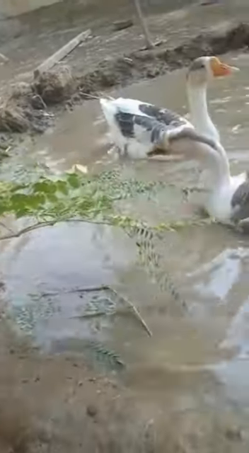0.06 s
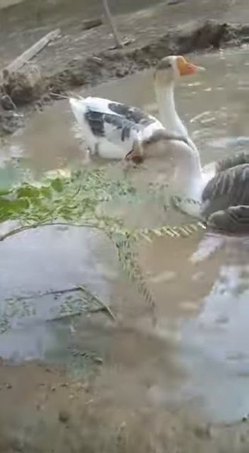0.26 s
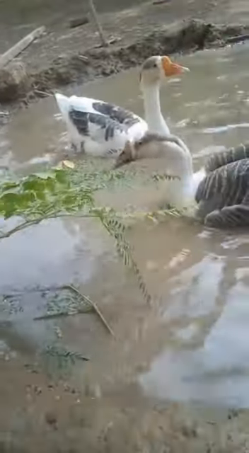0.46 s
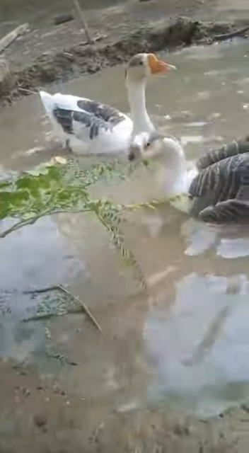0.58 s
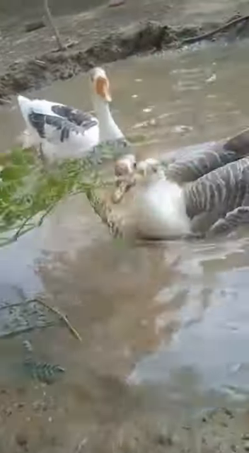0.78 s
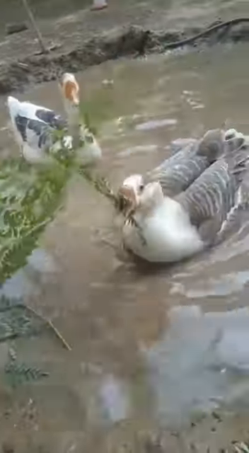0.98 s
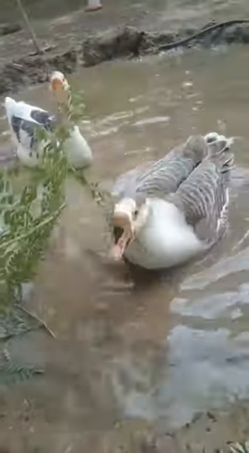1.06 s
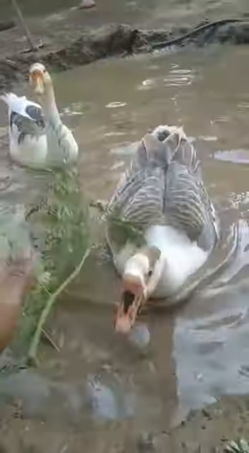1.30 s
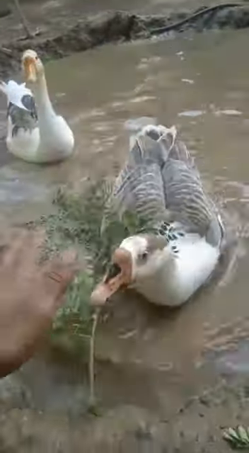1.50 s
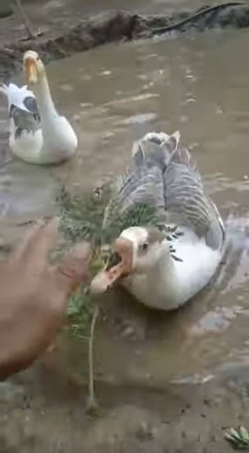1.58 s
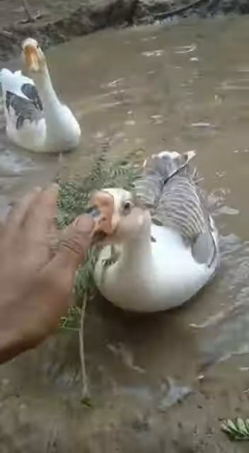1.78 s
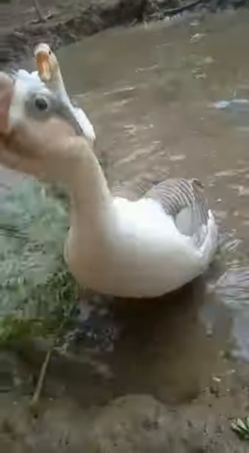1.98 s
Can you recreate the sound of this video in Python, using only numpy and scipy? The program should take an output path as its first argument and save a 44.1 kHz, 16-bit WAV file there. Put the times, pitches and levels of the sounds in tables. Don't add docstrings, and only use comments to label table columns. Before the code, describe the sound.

One loud, nasal goose honk comes early, a few metres away, with a short echo from the pond banks. Afterwards faint far geese, slight leaf rustles and a twig snap sit over a low engine drone.

```python
import sys
import numpy as np
from scipy import signal
from scipy.io import wavfile
from scipy.ndimage import uniform_filter1d

SR = 44100
rng = np.random.default_rng(int(sys.argv[2]) if len(sys.argv) > 2 else 0)


def to_wav(s):
    ch = np.atleast_2d(s).T
    pcm = np.round(np.clip(ch, -1, 1) * 32767)
    wavfile.write(sys.argv[1], SR, pcm.astype(np.int16))


def makeup_ratio(level_db):
    decades = np.asarray(level_db, float) / 20
    return 10 ** decades


N = 90404

# centre in Hz, width in Hz, level in dB, change at full gape in dB.
THROAT_MODES = [(650, 290, -6.5, -2), (855, 480, -1, -1), (1795, 170, 0.5, -3.5), (2078, 380, 3, 2),
                (2548, 150, -9.5, 10.5), (2850, 710, -23.5, 0.5), (3970, 840, -23.5, 9.5),
                (4950, 500, -20, -18), (5643, 730, -16.5, 0.5), (6760, 340, -35.5, 11.5),
                (9650, 1400, -45, -11.5), (11850, 1400, -51.5, 8)]


def curve(table, col):
    rows = np.array(table, float)
    return np.interp(np.arange(N) / SR, rows[:, 0], rows[:, col])


def level(x, db):
    return x * makeup_ratio(db) / np.sqrt(np.mean(x ** 2))


def band(x, hz, width_hz):
    return signal.lfilter(*signal.iirpeak(min(hz, 0.45 * SR), hz / width_hz, fs=SR), x)


def band_twice(x, hz, width_hz):
    return band(band(x, hz, width_hz), hz, width_hz)


def walk(rate_hz):
    hold = int(SR / rate_hz)
    steps = np.repeat(rng.standard_normal(N // hold + 1), hold)
    return 1.335 * uniform_filter1d(uniform_filter1d(steps, hold), hold)[:N]


def turns(hz):
    return 2 * np.pi * np.cumsum(hz) / SR


def throat_gain(hz, gape):
    power = 0
    for centre_hz, width_hz, db, gape_db in THROAT_MODES:
        detune = 2 * (hz - centre_hz) / width_hz
        power = power + makeup_ratio(2 * (db + gape * gape_db)) / (1 + detune ** 2) ** 2
    return np.sqrt(power)


def throat_breath(gape):
    tilt_db_per_octave = 12.5
    out = 0
    for hz, width_hz, db, gape_db in THROAT_MODES:
        hiss = level(band_twice(rng.standard_normal(len(gape)), hz, 1.9 * width_hz), 0)
        out = out + makeup_ratio(db + gape * gape_db) * hiss * makeup_ratio(tilt_db_per_octave * np.log2(hz / 2000))
    return level(out, 0)


def syrinx_lines(second_db, half_db, rasp_db, gape):
    difference_db, mixing, lower_half_db = -6, 0.3, -13
    lines = [(0.00057, 0.99, second_db + 1.5)]
    lines += [(m, 0, 0) for m in range(1, 16)]
    for m in range(1, 10):
        for n in (-4, -3, -2, -1, 1, 2, 3):
            order_db = second_db * (1 + mixing * (abs(n) - 1))
            lines.append((m, n, order_db + difference_db * gape * (n < 0)))
    for m in range(8):
        for n in (-1, 1):
            lines.append((m + 1 / 2, n, half_db + lower_half_db * ((m, n) != (1, 1))))
    lines += [(m + 1 / 2, -1 / 2, rasp_db) for m in range(1, 7)]
    return lines


def goose():
    # time in seconds, pitch in Hz, level in dB.
    creak = [(0.218, 878, -83), (.237, 891, -61.5), (.26, 873.8, -53.5), (0.267, 851.8, -55.5)]
    voice = [(.276, 837.4, -60), (.282, 847.2, -46), (.306, 882, -45.5), (.345, 887, -48),
             (.388, 981.2, -39), (.478, 963.5, -39.5), (.503, 1030, -41), (.54, 1002, -43),
             (.598, 953, -44.5)]
    ending = [(.605, 928, -47.5), (.612, 848.5, -48), (.62, 776, -62), (.625, 760, -85)]
    # time in seconds, pitch in Hz, strength against the main voice in dB.
    second_voice = [(.23, 722, 0), (.29, 707.3, -8), (.315, 745.6, -4.5), (.33, 650, -27.5),
                    (.392, 639, -7.5), (.408, 566.2, -13.5), (.482, 564.5, -12.5), (.5, 691.4, -7),
                    (.555, 690.7, -6), (.58, 687, -35)]
    # time in seconds, brightness in dB per octave, breath level in dB.
    effort = [(.23, -14, -28), (.31, -16, -25), (.33, -12, -30), (.385, -4.5, -32.5), (.402, -3.5, -19),
              (.43, 1, -26), (.485, -1, -19.5), (.51, 0.5, -21), (.58, 5, -19.5)]
    # time in seconds, strength in dB.
    flutter = [(.385, -38.5), (.402, -12), (.414, -47), (.492, -40), (.507, 5), (.52, -36), (.533, -1),
               (.553, -17), (.575, -50)]
    # time in seconds, strength in dB.
    rasp = [(.385, -45), (.398, -11), (.42, -17), (.445, -19), (.475, -23.5), (.492, -14), (.5, -45)]
    # time in seconds, gape 0-1.
    bill = [(.23, 0), (.32, 0), (.385, 0.8), (.44, 0.96), (.47, 0.74), (.55, 0.7), (.572, 0.4), (.62, 0)]
    from_s, to_s, closes_s = 0.2, 0.63, 0.6
    jitter, flutter_sway_db, sway_db = 0.002, 2.0, 2.15
    closing_db_per_s, pinch_db_per_s, pinch_low_hz, pinch_high_hz = -2500, -2500, 1400, 2400
    creak_bass_db, creak_bass_hz = -12, 1410
    scatter_rad, blur_hz = 0.2, 9500

    cut = slice(int(from_s * SR), int(to_s * SR))
    t = np.arange(N)[cut] / SR
    call = [(from_s, creak[0][1], -110)] + list(creak) + list(voice)
    call += list(ending) + [(to_s, ending[-1][1], -110)]
    main_hz = (curve(call, 1) * (1 + jitter * walk(150)))[cut]
    second_hz = (curve(second_voice, 1) * (1 + 2 * jitter * walk(88.4)))[cut]
    main_phase, second_phase = turns(main_hz), turns(second_hz)
    second_db = curve(second_voice, 2)[cut]
    half_db = (curve(flutter, 1) + flutter_sway_db * walk(68.1))[cut]
    gape = np.clip(curve(bill, 1)[cut], 0, 1)
    sway = [walk(46.28)[cut] for _ in range(5)]
    grain = [walk(500)[cut] for _ in range(5)]
    closing_s = np.maximum(t - closes_s, 0)
    bright = curve(effort, 1)[cut] + closing_db_per_s * closing_s
    intake = t < voice[0][0]

    tone = 0
    for k, (m, n, db) in enumerate(syrinx_lines(second_db, half_db, curve(rasp, 1)[cut], gape)):
        hz = np.abs(m * main_hz + n * second_hz) + 1
        tilt_db = bright * np.maximum(np.log2(hz / 2400), 0)
        tilt_db = tilt_db + creak_bass_db * intake * (hz < creak_bass_hz)
        tilt_db = tilt_db + pinch_db_per_s * closing_s * (hz > pinch_low_hz) * (hz < pinch_high_hz)
        gain = makeup_ratio(db + tilt_db + sway_db * sway[k % 5]) * throat_gain(hz, gape) * (hz < 0.35 * SR)
        phase = m * main_phase + n * second_phase
        phase = phase + scatter_rad * abs(n) * sway[(k + 2) % 5]
        phase = phase + (hz / blur_hz) ** 3 * grain[k % 5]
        tone = tone + gain * np.sin(phase)

    puffs = 1 + makeup_ratio(second_db / 2) * np.cos(main_phase - second_phase)
    puffs = puffs + makeup_ratio(half_db / 2) * np.cos(second_phase - main_phase / 2)
    breath = puffs * throat_breath(gape) * makeup_ratio(curve(effort, 2)[cut])
    honk = np.zeros(N)
    honk[cut] = makeup_ratio(curve(call, 2)[cut]) * (tone + breath)
    return honk


def bank_echo(honk):
    echo_db, t60_s, delay_s = -17.5, 0.33, 0.019
    t = np.arange(SR // 2) / SR
    tail = rng.standard_normal(len(t)) * makeup_ratio(-60 * t / t60_s) * (t > delay_s)
    banks = level(tail, echo_db) / np.sqrt(len(t))
    return band(signal.fftconvolve(honk, banks)[:N], 1800, 1500)


def drips_and_twig():
    # start in seconds, peak in dB, ring in Hz, t60 in seconds.
    drips = [
        (.035, -48.5, 1700, 0.022),
        (0.05, -52.5, 1640, .03),
        (.055, -53, 1810, 0.023),
        (.387, -70, 8200, .01),
        (.434, -75, 8300, 0.012),
        (1.613, -63.5, 3280, 0.049),
        (2.0485, -57, 8500, 0.0044),
    ]
    # start in seconds, level in dB.
    snaps = [
        (2.0356, -54),
        (2.0369, -49),
    ]
    # ring in Hz, level in dB, t60 in seconds.
    twig = [(2190, -8, 0.03), (4200, 6.5, 0.0054), (5750, 2.5, 0.0049), (7600, 5.5, 0.0031),
            (9300, -2.5, 0.0043), (11800, -7, 0.0034)]
    rings = list(drips)
    rings += [(start, snap_db + db, hz, t60_s) for start, snap_db in snaps for hz, db, t60_s in twig]
    t, out = np.arange(N) / SR, 0
    for start, db, hz, t60_s in rings:
        age = np.maximum(t - start, 0)
        attack = 1 - np.exp(-age * hz)
        out = out + makeup_ratio(db - 60 * age / t60_s) * np.sin(2 * np.pi * hz * age) * attack
    return out


def leaves():
    # start in seconds, level in dB, decay in seconds, centre in Hz.
    rustles = [(0.372, -79, 0.015, 8760), (.66, -71, 0.024, 4500), (0.907, -83, 0.017, 8000),
               (1.137, -72.5, 0.034, 2970), (1.26, -77.5, 0.071, 5960), (1.37, -76, 0.031, 6900),
               (1.435, -74, 0.0017, 12000), (1.458, -68, 0.002, 8500), (1.482, -63.5, 0.0019, 6030),
               (1.508, -62, 0.0016, 9900), (1.555, -78, 0.022, 9000), (1.606, -69, 0.0016, 7000),
               (1.815, -80, .0015, 12000), (1.855, -75.5, 0.037, 4870), (1.967, -78, .015, 7900),
               (2.03, -74, 0.012, 6040), (2.034, -63, 0.0017, 14000)]
    rise_s = 0.0003
    t, out = np.arange(N) / SR, 0
    for start, db, decay_s, hz in rustles:
        age = np.maximum(t - start, 0)
        grit = rng.standard_normal(N) * makeup_ratio(2.4 * walk(900))
        shape = (1 - np.exp(-age / rise_s)) * np.exp(-age / decay_s)
        out = out + level(band(grit, hz, 0.41 * hz), db) * shape
    return out


def far_geese():
    # start in seconds, length in seconds, pitch in Hz, level in dB, second partial in dB.
    calls = [
        (0.743, 0.084, 890, -64.5, -11),
        (0.895, 0.1, 840, -66.5, -12),
        (1.073, 0.099, 865, -66.5, -9),
        (1.508, 0.11, 867, -73.5, -10),
        (1.897, 0.074, 817, -72, -8),
    ]
    t, out = np.arange(N) / SR, 0
    for start, length_s, hz, db, upper_db in calls:
        phase = turns(hz * (1 + 0.0135 * walk(60)))
        shape = np.sin(np.pi * np.clip((t - start) / length_s, 0, 1))
        partials = np.sin(phase) + makeup_ratio(upper_db) * np.sin(2 * phase)
        out = out + makeup_ratio(db + 4.7 * walk(50.54)) * shape * partials
    return out


def engine():
    # multiple of the engine rate, level in dB.
    orders = [(2, -70), (3, -58.5), (5, -69), (6.6, -73.5), (8, -66), (9, -64), (10, -63), (11, -75.5)]
    engine_hz, whine_hz, whine_width_hz, whine_db = 37.17, 3115, 280, -82.5
    phase = turns(engine_hz * (1 + 0.00482 * walk(3.12)))
    whine = level(band_twice(rng.standard_normal(N), whine_hz, whine_width_hz), whine_db)
    out = whine * makeup_ratio(2 * walk(5.52))
    for order, db in orders:
        fading = makeup_ratio(db + (2.0 + 0.22 * order) * walk(11.94))
        out = out + fading * np.sin(order * phase + 0.1 * order * walk(14))
    return out


def air(shape, db, flicker_db, swell_db):
    rows, out = np.array(shape), 0
    low_hz, high_hz = rows[0, 0], min(rows[-1, 0], 14000)
    for hz in low_hz * 2 ** np.arange(1 / 8, np.log2(high_hz / low_hz), 1 / 4):
        band_db = np.interp(np.log(hz), np.log(rows[:, 0]), rows[:, 1]) + 10 * np.log10(hz)
        noise = band_twice(rng.standard_normal(N), hz, hz / 4)
        out = out + level(noise, band_db) * makeup_ratio(swell_db + flicker_db * walk(14.06))
    return level(out, db)


def scene():
    # frequency in Hz, density in dB.
    air_low = [(25, -26.5), (45, -22), (75, -7.5), (100, -1), (150, -12), (250, -5.5), (400, -10.5),
               (520, -41)]
    air_mid = [(310, -32.5), (520, -10), (589, -2), (797, -1.5), (866, -6), (1050, -8.5), (1580, -4),
               (2700, -19), (3510, -56.5), (5940, -120)]
    air_high = [(2700, -10), (3600, -6), (5000, -8.5), (7200, -9.5), (8200, -37), (9800, -21), (13500, -21)]
    # time in seconds, level in dB.
    swell = [(0, -1), (.12, 0.5), (.3, 1), (.65, 2), (.9, 0.5), (1.1, -0.2), (1.6, 0.5), (2.05, -2)]
    honk = goose()
    drone = makeup_ratio(curve(swell, 1)) * (engine() + air(air_low, -59, 2.8, 1.3 * walk(4)))
    stir = walk(9.48)
    hiss = air(air_mid, -65.5, 1.8, 0.88 * stir) + air(air_high, -78, 2.96, 0.5 * stir)
    near = honk + bank_echo(honk) + drips_and_twig() + leaves()
    return (near + far_geese() + drone + hiss)[None]


def top_cut(x):
    return signal.sosfilt(signal.butter(12, 16240, fs=SR, output="sos"), x)


def record(dry):
    def port_ring(x):
        return band_twice(x, 14800, 1400)

    port_noise = level(port_ring(rng.standard_normal(N)), -91.0) * makeup_ratio(2.4 * walk(17.0))
    port = dry + makeup_ratio(16) * port_ring(dry) + port_noise
    low_pass = signal.ellip(8, 0.2, 60, 15450, fs=SR, output="sos")
    return top_cut(signal.sosfilt(low_pass, port))


dry = scene()
out = record(dry)
to_wav(out)
```